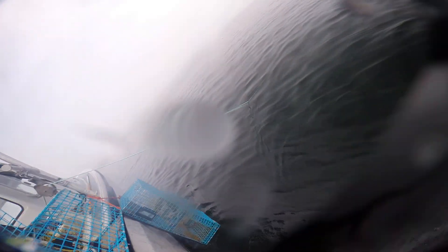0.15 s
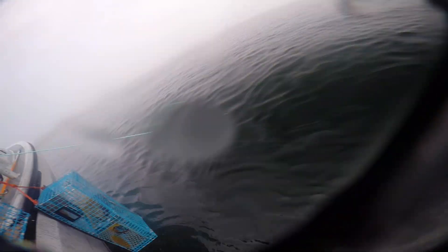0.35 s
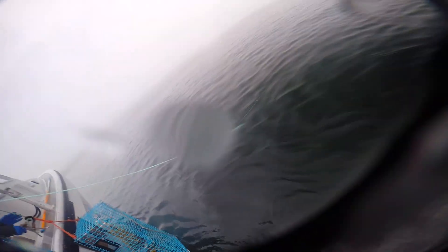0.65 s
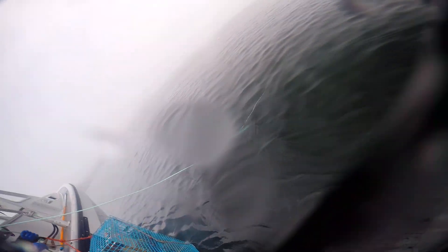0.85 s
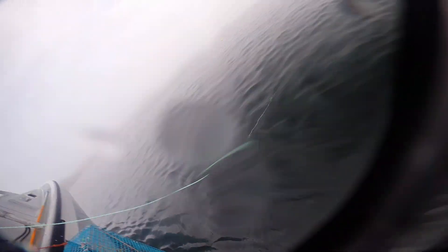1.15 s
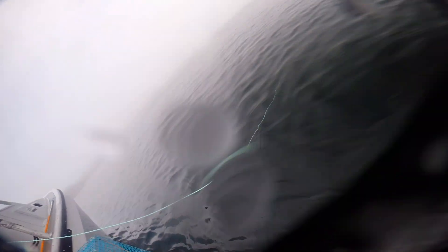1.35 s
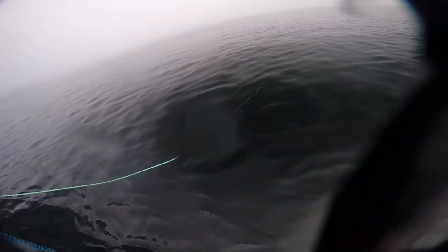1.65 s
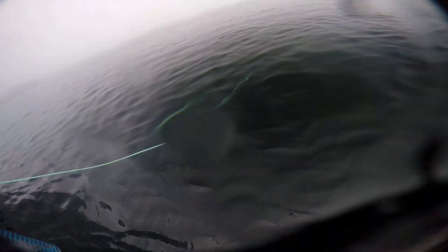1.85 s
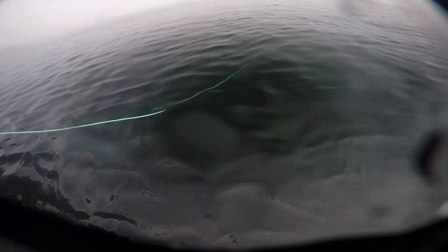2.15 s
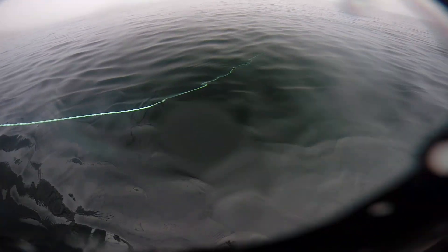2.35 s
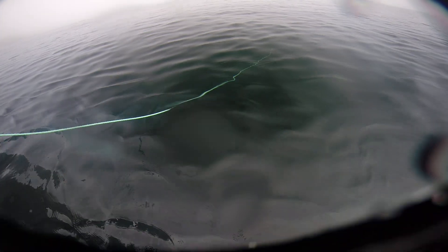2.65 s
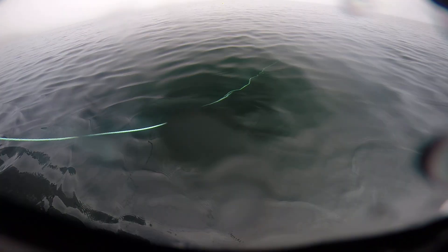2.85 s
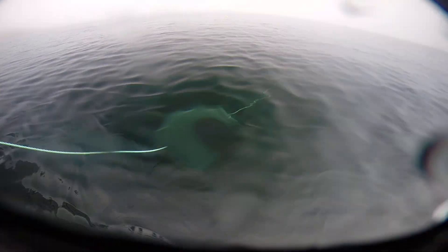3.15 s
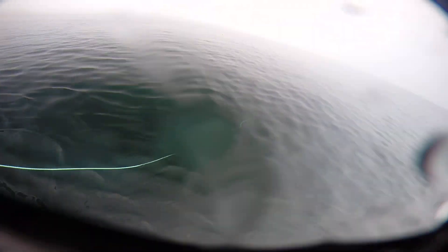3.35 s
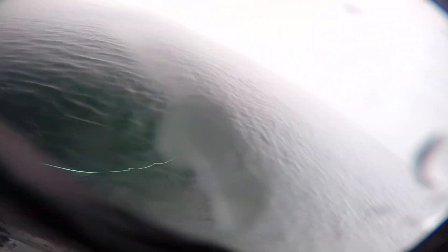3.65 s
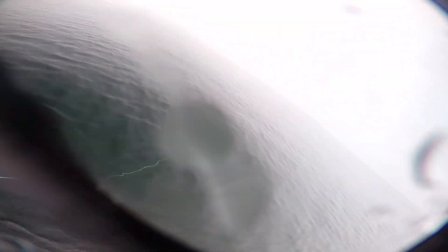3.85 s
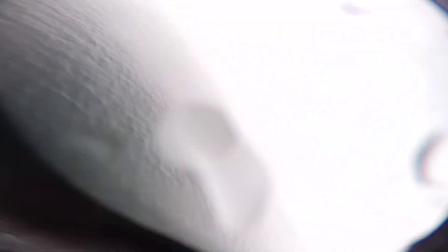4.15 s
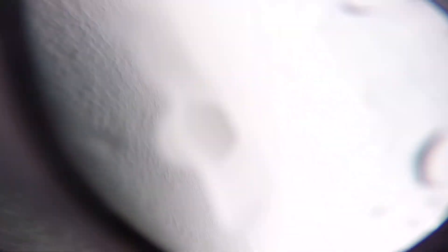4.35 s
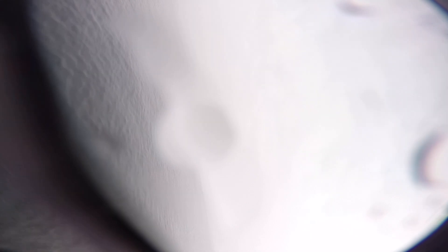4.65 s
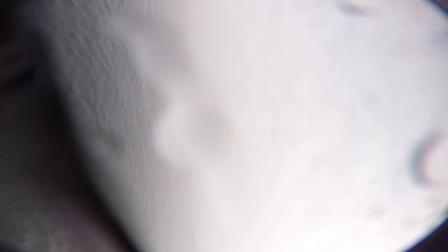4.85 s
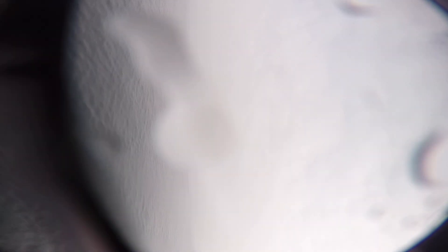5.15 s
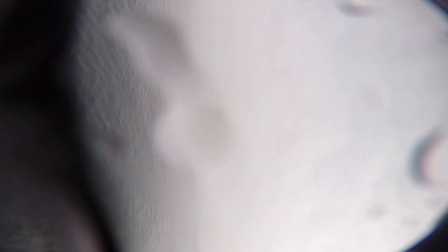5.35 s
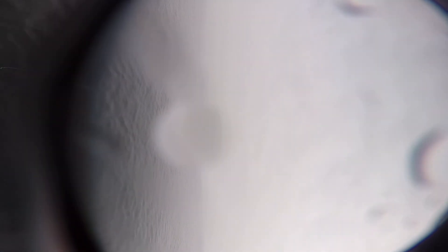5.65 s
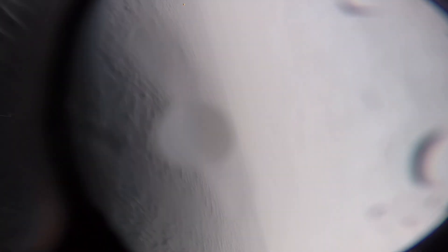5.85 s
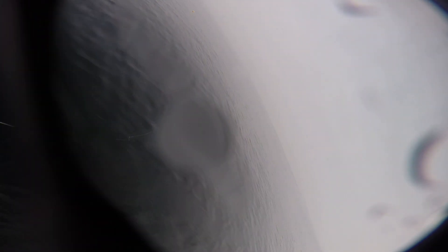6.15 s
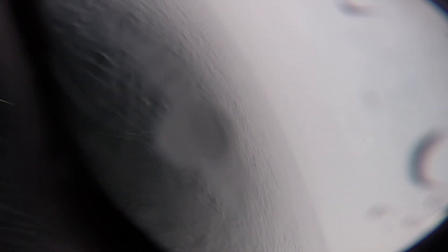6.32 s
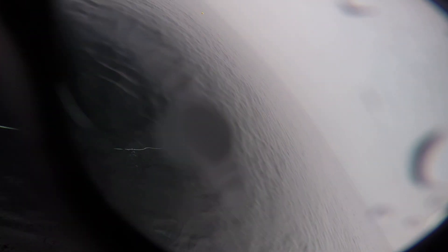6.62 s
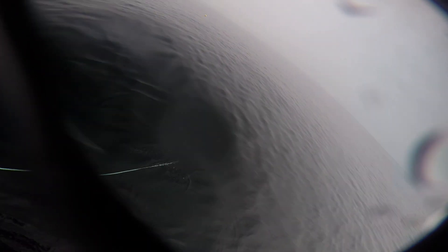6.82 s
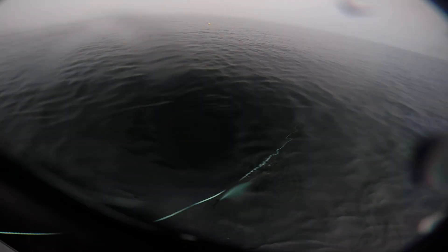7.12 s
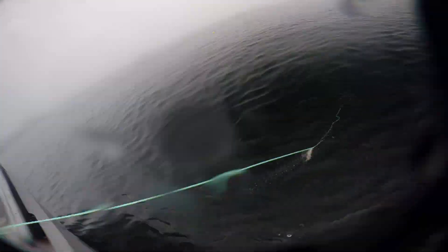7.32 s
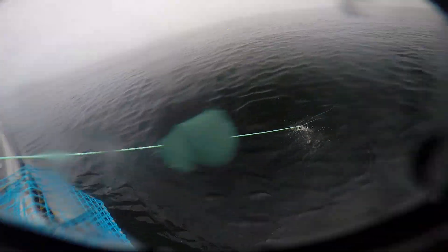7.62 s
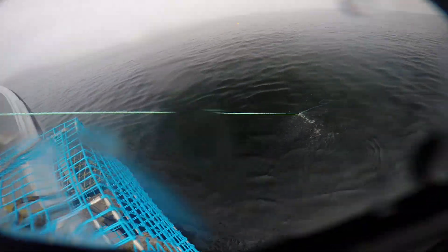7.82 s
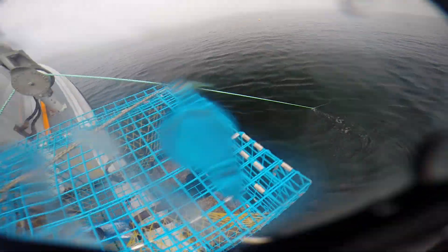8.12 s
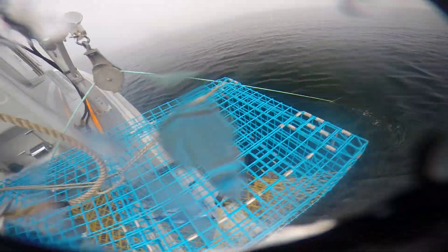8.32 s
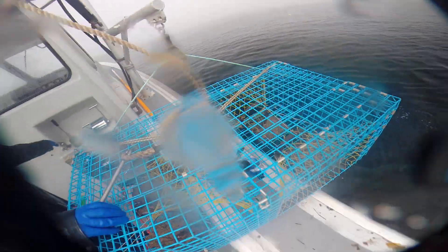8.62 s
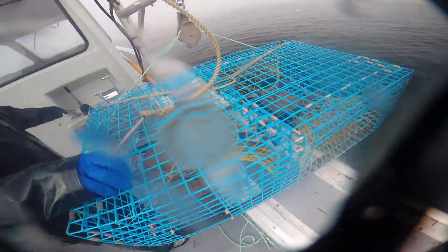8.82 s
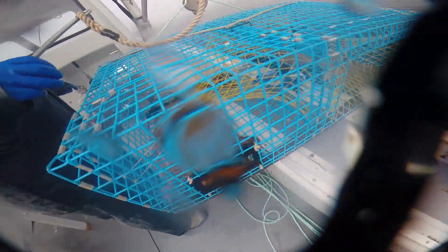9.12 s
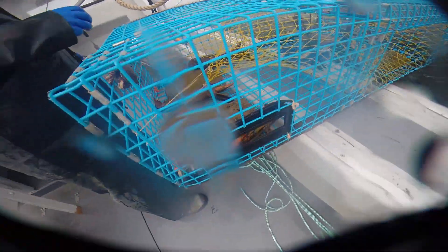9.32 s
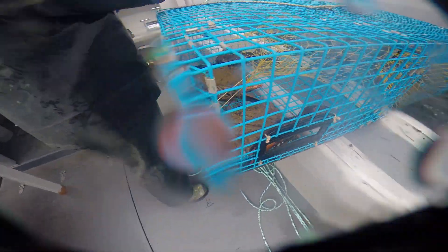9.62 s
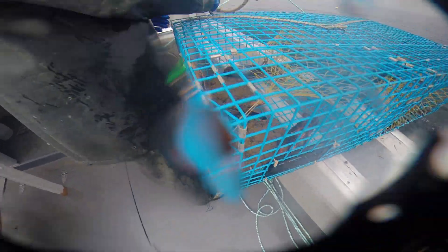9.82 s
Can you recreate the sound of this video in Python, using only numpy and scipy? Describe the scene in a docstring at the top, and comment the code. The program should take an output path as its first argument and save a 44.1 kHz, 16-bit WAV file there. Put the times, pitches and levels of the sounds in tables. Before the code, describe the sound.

Very close, boxy and muffled: low heaving rumble, fabric scrapes, strap groans and quick knocks open the scene, easing before one violent slam with a rattle. A calmer stretch leaves faint engine, washing sea and light ticks and rings of wet wire gear outside the case. Then the hood grinds again with a sharp rubber squeak, thumps and wind buffets, before quiet water and hissing line on deck.

```python
"""Hauling gear on a lobster boat

Heard from inside a waterproof camera case worn on the head, by the one microphone sealed in it.
Closest and loudest, an oilskin hood scrapes, judders, squeaks and knocks on the case: random grains
through resonances, gliding tones and struck modes. Beyond the case, filtered noise makes the engine,
sea, wind and line; decaying modes ring the wire gear. A limiter ducks everything after its peaks.
"""
import sys
import numpy as np
from scipy import signal
from scipy.fft import rfft, irfft
from scipy.io import wavfile
from scipy.ndimage import uniform_filter1d, minimum_filter1d, map_coordinates

SR = 44100
rng = np.random.default_rng(int(sys.argv[2]) if len(sys.argv) > 2 else 0)


def output_pcm(signal):
    """Save a mono or channel-first signal as 16-bit PCM at the path in sys.argv[1].

    Samples are clipped to [-1, 1] before scaling.
    """
    pcm = np.clip(np.atleast_2d(signal).T, -1, 1) * 32767
    wavfile.write(sys.argv[1], SR, np.round(pcm).astype(np.int16))


N = 440118
T = np.arange(N) / SR  # seconds


def undb(db):
    """Decibels to gain."""
    return 10 ** (np.asarray(db) / 20)


def unit(x):
    """Scale to rms 1."""
    return x / np.sqrt(np.mean(x ** 2))


def walk(rate, size=N):
    """Random wander of rms 1, in straight lines between rate new values a second."""
    at = np.arange(size) * rate / SR
    return unit(map_coordinates(rng.standard_normal(8192), [at], order=1, mode="wrap"))


def colour(x, spectrum, resonances=()):
    """Causal (minimum-phase) filter from a smooth spectrum with resonant peaks on it; rms 1."""
    size = 8192
    f = np.maximum(np.arange(size // 2 + 1) * SR / size, 1)
    hz, db = np.transpose(spectrum)
    db = np.interp(np.log(f), np.log(hz), db)
    for centre, width, lift in resonances:
        db = db + lift / (1 + (2 * (f - centre) / width) ** 2)
    # folding the cepstrum forward in time gives the causal response
    cepstrum = irfft(np.log(undb(db)))
    cepstrum[1:size // 2] *= 2
    cepstrum[size // 2 + 1:] = 0
    response = irfft(np.exp(rfft(cepstrum)))
    return unit(signal.oaconvolve(x, response)[:len(x)])


def grains(rate, spread_db):
    """Dense tiny slips of uneven size, about rate a second."""
    happens = rng.random(N) < rate / SR
    return happens * rng.standard_normal(N) * undb(spread_db * rng.standard_normal(N))


def soften(x, hz, order=1):
    """Low-pass."""
    return signal.sosfilt(signal.butter(order, min(hz, SR * .45), fs=SR, output="sos"), x)


def add(out, s, x):
    """Mix x into out at time s."""
    i = max(int(s * SR), 0)
    out[i:i + len(x)] += x[:len(out) - i]


def bend(x, speed):
    """Move every resonance of a steady sound by a changing factor."""
    return map_coordinates(x, [np.cumsum(speed)], order=3, mode="mirror")


def ringing(modes, t):
    """Sum of decaying modes after one tap."""
    out = np.zeros(len(t))
    for hz, db, t60 in modes:
        out += undb(db) * np.sin(2 * np.pi * hz * t) * np.exp(-np.log(1000) * t / t60)
    return out


def slips(table, overtone_db, waver_hz):
    """Stick-slip tones that swell, glide and stop, with an unsteady period and a faint octave."""
    out = np.zeros(N)
    for s, length, start_hz, end_hz, db, rough in table:
        n = int(length * SR)
        hz = np.geomspace(start_hz, end_hz, n) * (1 + rough * walk(waver_hz, size=n))
        phase = 2 * np.pi * np.cumsum(hz) / SR
        pressure = np.sin(np.linspace(0, np.pi, n)) ** 1.07
        tone = np.sin(phase) + undb(overtone_db) * np.sin(2 * phase)
        add(out, s, undb(db) * pressure * tone)
    return out


def swell(start, attack, hold, release, tilt_db=0):
    """Gain of one movement: it builds, holds while changing by tilt_db, and dies away."""
    fade_db = 24  # the span of one attack or release time
    outside = np.maximum(start - T, 0) / attack + np.maximum(T - start - hold, 0) / release
    held = np.clip((T - start) / hold, 0, 1)
    return undb(tilt_db * held - fade_db * np.minimum(outside, 10))


# The hood sliding over the case, right at the microphone. Each row: full contact in seconds,
# attack, hold and release in seconds, relative scrape level in dB, scrape change over the hold
# in dB (the judder swells by it too), relative judder level in dB.
STROKE_ROWS = [(0.044, 0.096, 0.3, 0.27, -33.5, -3, -28), (0.975, 0.26, .26, 0.0078, -34, -8.5, -33),
               (1.396, 0.085, 0.36, 0.012, -34, -1, -29), (1.849, 0.033, 0.056, 0.055, -40, 2, -28.5),
               (1.934, 0.15, 0.32, 0.23, -30, -2, -38), (2.312, 0.12, 0.076, 0.19, -39, 1, -30.5),
               (3.074, 0.31, 0.16, 0.14, -49.5, 0, -54), (6.765, 0.1, 0.35, 0.035, -36.5, 6, -32.5),
               (7.271, .11, .095, .27, -27.5, -1.5, -28.5), (7.501, 0.17, 0.31, 0.017, -41, 7.5, -39),
               (8.057, 0.14, 0.13, 0.014, -35.5, 8.5, -39.5), (8.207, 0.033, 0.16, 0.054, -40, -3.5, -36),
               (8.549, 0.13, 0.23, 0.12, -39.5, 0, -32.5)]
# The head moving, which heaves the mount. Each row: full weight in seconds, attack, hold and
# release in seconds, relative rumble level in dB, relative judder level in dB.
HEAVE_ROWS = [(0, .05, 0.17, 0.1, -15.5, -24), (0.103, 0.057, 0.053, 0.06, -19, -16.5),
              (0.318, 0.25, 0.13, 0.089, -13.5, -27), (0.462, 0.03, 0.047, 0.082, -16, -21.5),
              (0.614, 0.12, 0.34, 0.35, -25.5, -36.5), (1.432, 0.21, 0.061, .1, -26.5, -26.5),
              (1.47, 0.11, 0.27, 0.18, -19.5, -40), (1.883, 0.24, 0.31, 0.48, -20.5, -29.5),
              (2.169, 0.012, 0.011, 0.097, -17, -18), (2.404, 0.14, 0.083, 0.27, -23.5, -43),
              (3.065, 0.46, 0.14, 0.12, -38.5, -42.5), (3.89, 0.39, 0.26, 0.24, -31, -39),
              (4.638, 0.24, 0.32, 0.26, -43, -43.5), (5.42, 0.67, 0.13, 0.052, -38.5, -45.5),
              (6.265, 0.6, 0.034, 0.082, -35, -42), (6.753, 0.33, 0.14, 0.11, -33.5, -34),
              (7.027, 0.8, 0.24, 0.11, -24.5, -31.5), (7.278, 0.17, 0.045, 0.95, -13, -23.5),
              (7.466, 0.11, 0.32, 0.54, -28, -31.5), (8.045, 0.16, 0.12, 0.065, -17, -26),
              (8.195, 0.039, 0.21, 0.08, -16, -34), (8.538, 0.12, 0.28, 0.27, -23.5, -34.5)]


def efforts():
    """Gains of scrape, judder and rumble: strokes scrape, heaves rumble, both judder; powers add."""
    scrape, judder, rumble = np.zeros((3, N))
    for start, attack, hold, release, scrape_db, swell_db, judder_db in STROKE_ROWS:
        contact = swell(start, attack, hold, release, swell_db)
        scrape += (undb(scrape_db) * contact) ** 2
        judder += (undb(judder_db) * contact) ** 2
    for start, attack, hold, release, rumble_db, judder_db in HEAVE_ROWS:
        weight = swell(start, attack, hold, release)
        rumble += (undb(rumble_db) * weight) ** 2
        judder += (undb(judder_db) * weight) ** 2
    return np.sqrt([scrape, judder, rumble])


# Fabric against the case. Each row: frequency in Hz, relative level in dB.
SCRAPE_SPECTRUM = [(250, -31), (550, 4), (900, 0), (1400, -5), (2200, -2), (3000, -1), (3900, -14),
                   (5500, -28.5), (7000, -33), (9000, -37.5), (11000, -41), (15000, -57.5)]
# Resonances of the case and the air trapped around the microphone, also rung by the zips.
# Each row: centre in Hz, width in Hz, lift in dB (for the scrape).
CASE_RESONANCES = [(780, 108, 12.5), (1061, 44, 8.5), (1209, 95, 9), (1606, 244, 16), (1780, 120, 5.5),
                   (2024, 160, 8.5), (2410, 96, 7.5), (2635, 183, -9.5), (2776, 140, 8.5), (4910, 370, 5.5),
                   (6275, 600, 14), (7070, 870, 6.5), (9100, 2000, 8)]


def hood_scrape(effort):
    """Fabric grains excite the case, with an echo from its rim."""
    slipping = grains(rate=7000, spread_db=0.0) * undb(1.2 * walk(90) + 1.0 * walk(22))
    scrape = colour(slipping, SCRAPE_SPECTRUM, CASE_RESONANCES)
    # the contact point wanders, so its echo from the rim of the case shifts the resonances
    lag_s = 0.002178 * np.exp(0.13 * walk(7))
    scrape = unit(scrape + .42 * map_coordinates(scrape, [(T - lag_s) * SR], order=1))
    # the treble rises in pitch as the hood presses harder
    body = signal.sosfiltfilt(signal.butter(4, 3500, fs=SR, output="sos"), scrape)
    treble = bend(scrape - body, 1 + .035 * np.log(effort / .016 + .25))
    return undb(5.0) * effort * (body + treble)


# Coarse slips of hood and mount. Each row: frequency in Hz, relative level in dB.
JUDDER_SPECTRUM = [(90, -22), (190, -3.5), (260, 9.5), (320, 3), (400, -1.5), (520, -11), (800, -13),
                   (1400, -24), (4000, -62.5), (12000, -93)]


def hood_judder(effort):
    """Coarser slips shake the case in surges, their pitch wandering."""
    slipping = colour(grains(rate=830, spread_db=0.5), JUDDER_SPECTRUM)
    judder = bend(slipping, np.exp(.14 * walk(12))) * undb(1.8 * walk(30))
    return undb(-2.0) * effort * judder


# The mount heaving under the case. Each row: frequency in Hz, relative level in dB.
RUMBLE_SPECTRUM = [(15, -23.5), (30, -17), (50, -3.5), (85, -4), (125, -8), (170, -14), (240, -26),
                   (500, -40), (2000, -96.5)]
# Low resonances of the head mount. Each row: centre in Hz, width in Hz, lift in dB.
MOUNT_RESONANCES = [(89.3, 34, 8.5), (142.1, 14, 10.5)]


def mount_rumble(effort):
    """Slow grains heave the resonant head mount."""
    rumble = colour(grains(rate=600, spread_db=1.0), RUMBLE_SPECTRUM, MOUNT_RESONANCES)
    # the strap takes up slack, so the heaving stays even within a movement
    rumble /= np.sqrt(uniform_filter1d(rumble ** 2, int(.06 * SR)) + 0.061)
    return undb(-0.5) * effort * rumble


# The engine as it reaches the case. Each row: frequency in Hz, relative level in dB.
ENGINE_SPECTRUM = [(12, -42), (26, -0.5), (43, -5.5), (85, 0), (110, -1.5), (139, -8), (200, -18.5),
                   (240, -23.5), (310, -16), (360, -28.5), (480, -34), (650, -48), (1100, -84.5)]


def engine():
    """The idling engine: low filtered noise with a fluttering level."""
    return colour(rng.standard_normal(N), ENGINE_SPECTRUM) * undb(-44.0 + walk(20.0))


# Sea wash along the hull, and line running through the hauler.
# Each row: time in seconds, wash level in dB, line hiss level in dB.
DECK_LEVELS = [(0, -77, -79.5), (.7, -60.5, -84), (1.299, -57, -86), (2.001, -58.5, -81),
               (2.7, -54.5, -70.5), (3.45, -52.5, -65.5), (3.7, -55, -97.5), (4.502, -53.5, -67.5),
               (5.2, -46.5, -66), (5.6, -51, -71.5), (6.5, -48, -67), (7.9, -46, -60), (8.45, -50.5, -67.5),
               (9.8, -47, -57)]
# Wash heard through the case. Each row: frequency in Hz, relative level in dB.
SEA_SPECTRUM = [(200, 5), (450, -3.5), (800, -2.5), (1300, -3), (1650, 3), (2200, -3), (2900, -7),
                (3600, -15), (5500, -20.5), (8000, -22.5), (11000, -30.5), (15000, -35)]


def sea():
    """Dense uneven grains of water wash along the hull."""
    s, wash_db, _ = np.transpose(DECK_LEVELS)
    resonances = [(750, 54, -6.0), (2680, 120, 1.5)]  # centre Hz, width Hz, lift dB
    wash = colour(grains(rate=8000, spread_db=0.5), SEA_SPECTRUM, resonances)
    return undb(np.interp(T, s, wash_db)) * wash * undb(walk(15))


# Running line heard through the case. Each row: frequency in Hz, relative level in dB.
LINE_SPECTRUM = [(2000, -18.5), (3600, -1.5), (4400, 6), (4700, 9.5), (5100, -1.5), (5700, 11), (6800, -18),
                 (9000, -43.5), (14000, -42)]


def line():
    """Line hisses over the sheave: a treble band of noise that flickers."""
    s, _, hiss_db = np.transpose(DECK_LEVELS)
    hiss = colour(rng.standard_normal(N), LINE_SPECTRUM)
    return undb(np.interp(T, s, hiss_db)) * hiss * undb(2.0 * walk(25))


# Wind on the case as the head leans out over the rail.
# Each row: time in seconds, relative level in dB.
BUFFET_LEVELS = [(0, -46.5), (2.2, -31.5), (2.8, -49), (5.2, -48), (6.8, -33), (7.1, -19.5), (7.7, -27),
                 (8.2, -31), (8.6, -32.5), (9.1, -38)]
# Flutter inside the case. Each row: frequency in Hz, relative level in dB.
WIND_SPECTRUM = [(12, -16.5), (32, 14), (52, 6.5), (80, -21.5), (300, -61.5)]


def wind():
    """Eddies push on the case, felt as a deep flutter."""
    level_db = np.interp(T, *np.transpose(BUFFET_LEVELS)) - 6.5
    return undb(level_db) * colour(rng.standard_normal(N), WIND_SPECTRUM)


def camera_whine():
    """The camera beside the microphone gives a thin steady sine."""
    return undb(-84) * np.sin(2 * np.pi * 14625 * T)


# Wet rubber slipping on the case, close up. Each row: start in seconds, length in seconds,
# start pitch in Hz, end pitch in Hz, peak level in dB, roughness as a fraction of the pitch.
SQUEAK_ROWS = [(.04, 0.021, 2056, 2000, -19, 0.033), (1.0, 0.091, 1620, 1580, -25, 0.032),
               (1.71, 0.044, 1573, 1662, -24, 0.035), (1.84, 0.025, 1596, 1760, -15, 0.051),
               (3.623, 0.037, 1864, 1666, -30.5, 0.11), (7.213, 0.037, 1890, 2630, -20.5, 0.1),
               (7.309, 0.026, 1592, 1580, -5.5, 0.016), (7.65, 0.12, 4750, 4490, -43.5, 0.094),
               (7.68, 0.023, 3900, 4580, -37, 0.072), (7.708, 0.018, 4840, 4560, -35, 0.042),
               (7.742, 0.018, 4430, 4600, -30.5, 0.028), (7.768, 0.028, 4700, 3870, -30, 0.076),
               (7.793, 0.019, 3450, 2990, -26.5, 0.091)]


def squeaks():
    """Wet rubber sticks and slips fast enough to sing."""
    return slips(SQUEAK_ROWS, overtone_db=-24.5, waver_hz=880)


# Wet rubber slipping slowly on the case. Each row: start in seconds, length in seconds, # start pitch in Hz,
# end pitch in Hz, peak level in dB, roughness as a fraction of the pitch.
GROAN_ROWS = [(.06, 0.13, 155.7, 130, -16.5, 0.047), (.435, 0.074, 274.6, 240, -10.5, 0.069),
              (.46, 0.075, 132, 126, -9, 0.068), (1.07, 0.15, 85, 80, -20, .03),
              (1.215, 0.098, 71.3, 65.4, -20.5, 0.084), (1.47, 0.14, 204, 189, -19, 0.071),
              (2.0, 0.084, 93, 83.3, -13.5, 0.028), (2.2, 0.1, 156.3, 137.3, -17.5, 0.051),
              (2.95, 0.19, 87.6, 84, -28, .03), (7.26, 0.026, 294, 262, -10.5, 0.048),
              (7.29, 0.035, 170.5, 150, -21, 0.048), (7.365, 0.094, 233, 172, -15, 0.058),
              (7.435, 0.076, 166.5, 115, -14.5, 0.061), (8.19, 0.11, 139.6, 140.5, -7, 0.027),
              (8.205, 0.12, 211.5, 185.4, -17, 0.058), (8.295, 0.081, 141.4, 130, -10.5, .03),
              (8.33, 0.19, 134.7, 139, -19.5, 0.025), (8.58, 0.23, 143.8, 134, -17.5, 0.033),
              (8.76, 0.12, 93, 85.4, -16.5, .03)]


def groans():
    """The rubber sticks and slips slowly, at a low pitch."""
    return slips(GROAN_ROWS, overtone_db=-23.5, waver_hz=118.3)


# The case rocking on its springy mount. Each row: start in seconds, peak level in dB,
# start pitch in Hz, settled pitch in Hz, rise time in seconds, decay time in seconds.
BUMP_ROWS = [(0.116, 1.5, 106, 125.5, 0.0081, 0.015), (.16, -3, 190, 126, 0.0037, 0.0042),
             (.188, -4, 199, 104, 0.0039, 0.0067), (0.213, -2.5, 111, 93, 0.005, 0.01),
             (.356, -3, 129, 81, 0.016, 0.016), (0.405, -4.5, 92.4, 94.4, 0.0047, 0.0084),
             (0.548, -3, 170, 85, 0.0057, 0.0088), (.633, 3.5, 339, 235, 0.0067, 0.0041),
             (0.68, -16, 322, 84, .008, 0.019), (0.756, -12, 335, 76.4, 0.0088, 0.017),
             (.809, -10, 333, 85.6, 0.019, 0.024), (2.168, -7.5, 410, 94, 0.011, 0.021),
             (3.606, -2.5, 190, 88.6, 0.0094, 0.033), (3.662, -18, 190, 150, .006, .018),
             (3.712, -20, 140, 85, 0.011, 0.019), (7.121, -5.5, 59.9, 49.3, 0.013, 0.008),
             (7.267, -9, 425, 76.4, 0.02, 0.03), (7.333, -10.5, 100.3, 85.4, 0.0061, 0.02),
             (8.183, -1.5, 62.7, 73.9, 0.0031, 0.024), (8.55, -12.5, 150.6, 106, 0.01, 0.021)]


def bumps():
    """The case rocks on its mount: a round thud whose pitch settles as the padding relaxes."""
    t = T[:SR // 3]
    settle_s = 0.00648
    out = np.zeros(N)
    for s, db, start_hz, settled_hz, rise, decay in BUMP_ROWS:
        hz = settled_hz + (start_hz - settled_hz) * np.exp(-t / settle_s)
        fade = (1 - np.exp(-t / rise)) ** 2 * np.exp(-t / decay)
        add(out, s, undb(db) * fade / fade.max() * np.sin(2 * np.pi * np.cumsum(hz) / SR))
    return out


# What a contact rings in the case. Each row: frequency in Hz, relative level in dB, t60 in seconds.
KNOCK_RINGING = [(82.4, -19, 0.58), (135, -17, 0.25), (206, -13.5, 0.038), (267, 1, 0.046),
                 (306.7, 1, 0.043), (407, -1, 0.027), (576, 1.5, 0.017), (770, -0.5, 0.02),
                 (1190, -11, 0.0065), (1580, -4, 0.006), (2080, -6.5, 0.0079), (2330, -8.5, 0.012),
                 (2700, -8.5, 0.009), (5600, -16, 0.0037), (9000, -33, .003)]


def blow(db, corner_hz, rattle_db, rattle_s):
    """One contact rings the case and rattles it in its clip; a softer contact leaves only the thud."""
    t = T[:SR // 3]
    rattle = rng.standard_normal(len(t)) * np.exp(-t / rattle_s) * (1 - np.exp(-2 * t / rattle_s))
    rattle -= soften(rattle, 680)  # light chatter carries no weight
    push = undb(rattle_db) * rattle / np.linalg.norm(rattle)
    push[0] += 1
    sound = signal.fftconvolve(push, ringing(KNOCK_RINGING, t))[:len(t)]
    sound = soften(soften(sound, corner_hz), 4 * corner_hz)
    sound -= soften(sound, 67)  # each contact keeps no bass below about 67 Hz
    return undb(db) * sound / np.abs(sound).max()


# Single knocks and scuffs on the case. Each row: start in seconds, peak level in dB,
# contact corner in Hz, rattle level against the contact in dB, rattle decay in seconds.
KNOCK_ROWS = [(.2705, -5.5, 990, 4, 0.0058), (.48, -8.5, 700, 2, .007), (0.5365, -5, 600, -2, 0.0024),
              (.5395, -1.5, 1480, 7, 0.0021), (.5435, -2.5, 1780, 4, 0.0033), (0.557, -23, 8800, -13, .001),
              (.563, -18.5, 3500, 2.5, 0.0026), (0.661, -15, 9000, -5, .001), (.682, -14.5, 700, 6, 0.0043),
              (.753, -22, 398, 1, 0.0073), (0.806, -11.5, 350, 7.5, 0.014), (1.476, -14, 400, -3, 0.0087),
              (2.166, -6.5, 690, 7, 0.0074), (3.593, 0, 800, -2, 0.0018), (5.108, -34, 1109, 8, 0.0064),
              (7.269, -10, 700, 5.5, .008), (7.309, -8, 910, 8, 0.011), (8.164, -15, 701, 1.5, 0.0089)]


def knocks():
    """Each knock is one contact on the case."""
    out = np.zeros(N)
    for s, *contact in KNOCK_ROWS:
        add(out, s, blow(*contact))
    return out


# Hard slams that bounce the case in its clip. Each row: start in seconds, base level in dB,
# base rattle in dB, hardness as a factor on the contact corners, factor on the contact delays.
SLAM_ROWS = [(.629, -3, 10, 0.4, 0.85), (3.5898, 10.5, 7, 0.6, .92)]
# unscaled delay in seconds, level added in dB, unscaled contact corner in Hz, rattle added in dB.
BOUNCE_ROWS = [(0, 2.5, 1350, -6), (.0066, -0.5, 850, -5), (.0096, 1.5, 330, -27), (0.0121, -3, 9000, -11),
               (0.0146, -0.5, 284, -16)]


def slams():
    """Each slam is a quick run of contacts on the case."""
    out = np.zeros(N)
    for s, db, rattle_db, hardness, stretch in SLAM_ROWS:
        for delay, share_db, corner_hz, loose_db in BOUNCE_ROWS:
            contact = blow(db + share_db, hardness * corner_hz, rattle_db + loose_db, rattle_s=0.0036)
            add(out, s + stretch * delay, contact)
    return out


# Ribs of the hood's weave zipping over the case rim, higher as the hood slides faster. Each row:
# start in seconds, length in seconds, start pitch in Hz, end pitch in Hz, relative level in dB.
ZIP_ROWS = [(1.02, .13, 818.6, 791, -32.5), (1.409, 0.098, 905, 1310, -34), (1.601, .16, 2727, 2895, -42.5),
            (1.917, 0.11, 1004, 1900, -32.5), (2.02, 0.28, 2915, 2200, -32),
            (6.725, 0.19, 1898, 2112, -34.5), (6.942, 0.17, 2084, 2498, -30), (7.15, 0.14, 1752, 1695, -31),
            (8.049, .145, 2100, 2790, -33.5)]
# A zip at its reference pitch of 2000 Hz. Each row: frequency in Hz, relative level in dB.
ZIP_SPECTRUM = [(900, -38), (1600, -1.5), (2000, -1), (2350, -4), (3200, -49.5)]


def zips():
    """The weave's ribs tick over the rim in a narrow, gliding band that rings the case."""
    knots = []
    for s, length, start_hz, end_hz, _ in ZIP_ROWS:
        knots += [(s, start_hz), (s + length, end_hz)]
    pitch_hz = np.interp(T, *np.transpose(sorted(knots))) * np.exp(0.064 * walk(25))
    ribs = bend(colour(rng.standard_normal(N), ZIP_SPECTRUM), pitch_hz / 2000)
    # the case rings at half its lift, over a flat spectrum
    half_case = [(hz, width, lift / 2) for hz, width, lift in CASE_RESONANCES]
    ribs = colour(ribs, [(20, 0), (20000, 0)], half_case)
    ribs /= np.sqrt(uniform_filter1d(ribs ** 2, SR // 20) + 1e-6)  # even out the level
    pressure = np.zeros(N)
    for s, length, _, _, db in ZIP_ROWS:
        add(pressure, s, undb(db) * np.sqrt(np.hanning(int(length * SR))) ** 0.85)
    return pressure * ribs * undb(1.3 * walk(45))


# Wet line and gear at the hauler, beyond the case. Each row: start in seconds,
# relative level in dB, decay in seconds, treble lift in dB.
CLATTER_ROWS = [(3.138, -31, 0.014, -19), (3.199, -28.5, 0.02, -7), (4.64, -31.5, 0.062, -8),
                (4.679, -28.5, 0.019, -4), (4.697, -31, 0.0066, -10), (4.706, -30, 0.016, 3),
                (4.748, -29.5, 0.014, -20), (4.9331, -18, 0.002, -18), (4.94, -16.5, 0.0018, -8),
                (4.95, -33, 0.017, -17), (5.177, -28.5, 0.014, -11), (5.186, -29, 0.023, -6),
                (5.2158, -28.5, 0.021, 12), (5.296, -31.5, 0.0065, -18), (5.377, -38.5, 0.016, 4),
                (5.421, -38.5, 0.025, 2), (5.895, -41.5, 0.021, 7), (9.865, -34.5, 0.047, -2)]
# Gritty part of the clatter. Each row: frequency in Hz, relative level in dB.
GEAR_SPECTRUM = [(300, -23), (1200, -3), (1600, 9), (2800, -5), (3500, -0.5), (4400, -1.5), (5700, -9.5),
                 (8000, -12.5), (13000, -18), (15000, -24)]
# What the wire gear rings with. Each row: central frequency in Hz (every burst scatters it),
# relative level in dB, t60 in seconds.
GEAR_RINGING = [(1526, 8, 0.0054), (2184, -0.5, 0.028), (2735, 8, 0.024), (3000, -2, 0.054),
                (4160, -13, 0.083), (4343, -8, 0.046), (5530, 0, 0.017), (6310, -5, 0.022),
                (8300, -18, 0.05), (10900, -20, 0.064), (13000, -26, .07)]


def clatter():
    """Bursts of tiny contacts as wet line and wire gear jump; each burst rings the wire differently."""
    t = T[:SR // 5]
    contacts = grains(rate=6000, spread_db=3.0)
    crackle = colour(contacts, GEAR_SPECTRUM)
    bright = signal.butter(4, 6500, "high", fs=SR, output="sos")
    out = np.zeros(N)
    for s, db, decay, treble_db in CLATTER_ROWS:
        part = slice(int(s * SR), int(s * SR) + len(t))
        fade = np.exp(-t / decay) * (1 - np.exp(-t / 0.001))
        taps = np.resize(contacts[part], len(t)) * fade
        grit = np.resize(crackle[part], len(t)) * fade
        rings = np.zeros(len(t))
        for hz, gain_db, t60 in GEAR_RINGING:
            # the touch on every wire varies on its own
            touch = taps * undb(0.89 * walk(310, size=len(t)))
            scattered_hz = hz * np.exp(0.0635 * rng.standard_normal())
            rings += signal.fftconvolve(touch, ringing([(scattered_hz, gain_db, t60)], t))[:len(t)]
        burst = unit(grit) + undb(-1.0) * unit(rings)
        burst += (undb(treble_db) - 1) * signal.sosfiltfilt(bright, burst)
        # a longer fade carries more energy
        add(out, s, undb(db - 7.0) * unit(burst) * np.sqrt(np.mean(fade ** 2)))
    return out


# Single wires flicked hard out at the gear. Each row: start in seconds, peak level in dB,
# pitch in Hz, t60 in seconds.
PING_ROWS = [(3.145, -46, 4180, .07), (3.2, -25, 2740, 0.081), (3.205, -31, 3770, 0.025),
             (4.682, -27, 1580, 0.038), (4.706, -35, 4240, 0.16), (4.749, -30, 1520, 0.079),
             (5.2177, -33.5, 4100, 0.092)]
# Partials of one wire. Each row: ratio to its pitch, relative level in dB.
WIRE_PARTIALS = [(1, 8), (1.04, -12), (1.42, -4.5), (2.33, -9)]


def pings():
    """A flicked wire rings briefly; with a short t60 it only ticks."""
    out = np.zeros(N)
    for s, db, hz, t60 in PING_ROWS:
        modes = [(hz * ratio, gain_db, t60) for ratio, gain_db in WIRE_PARTIALS]
        ring = ringing(modes, T[:SR // 5])
        add(out, s, undb(db) * ring / np.abs(ring).max())
    return out


# The sheave of the hauler, faint beyond the case. Each row: start in seconds, length in seconds,
# start pitch in Hz, end pitch in Hz, relative level in dB, roughness as a fraction of the pitch.
CHIRP_ROWS = [(3.36, 0.035, 5600, 5620, -56, 0.012), (3.5, 0.035, 5620, 5620, -55, 0.0073),
              (4.77, 0.18, 3350, 3340, -60, .005), (5.13, .06, 5750, 5670, -55, .01),
              (5.29, 0.082, 5720, 5670, -54, 0.0061), (6.3, 0.37, 4130, 4230, -58, 0.039)]


def chirps():
    """The sheave sticks and slips in faint high chirps."""
    return undb(1.0) * slips(CHIRP_ROWS, overtone_db=-26, waver_hz=680)


def scene():
    """Everything meets at the one microphone in the case."""
    scrape_gain, judder_gain, rumble_gain = efforts()
    hood = hood_scrape(scrape_gain) + hood_judder(judder_gain) + mount_rumble(rumble_gain)
    contacts = squeaks() + groans() + bumps() + knocks() + slams() + zips()
    boat = engine() + sea() + line() + clatter() + pings() + chirps()
    return (hood + contacts + boat + wind() + camera_whine())[None]


def record(dry):
    """The microphone sheds deep bass; a limiter catches peaks at once, lets go slowly; the top is cut."""
    dry = signal.sosfilt(signal.butter(2, 18, "high", fs=SR, output="sos"), dry)
    over_db = 20 * np.log10(np.maximum(np.abs(dry[0]) / .98, 1))
    release_db = 15 * T  # 15 dB regained a second
    duck_db = np.maximum.accumulate(over_db + release_db) - release_db
    gain = uniform_filter1d(minimum_filter1d(undb(-duck_db), size=64), size=64)
    top_cut = signal.ellip(8, .2, 70, 15300, fs=SR, output="sos")
    return signal.sosfilt(top_cut, dry * gain)


dry = scene()
out = record(dry)
output_pcm(out)
```